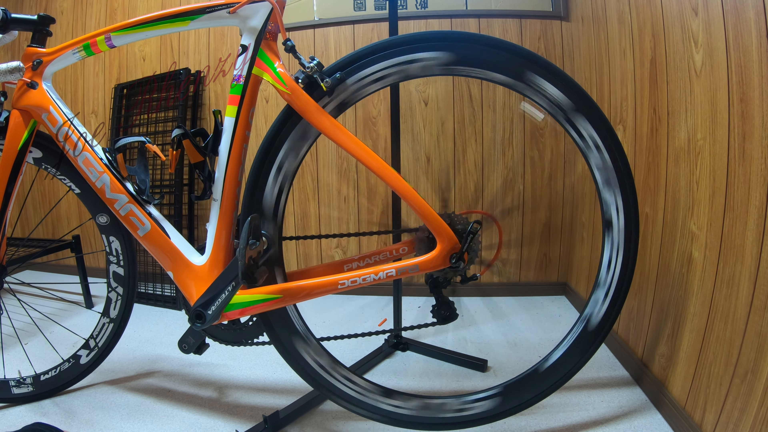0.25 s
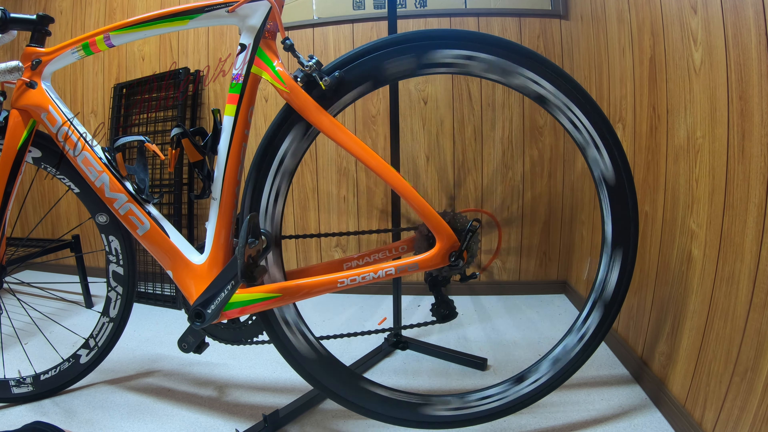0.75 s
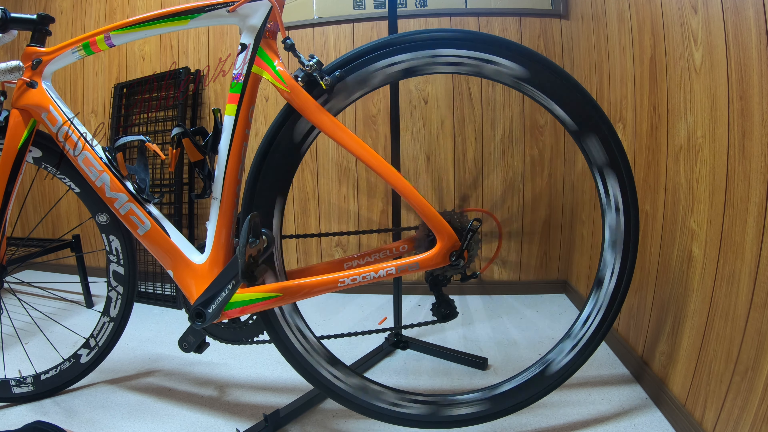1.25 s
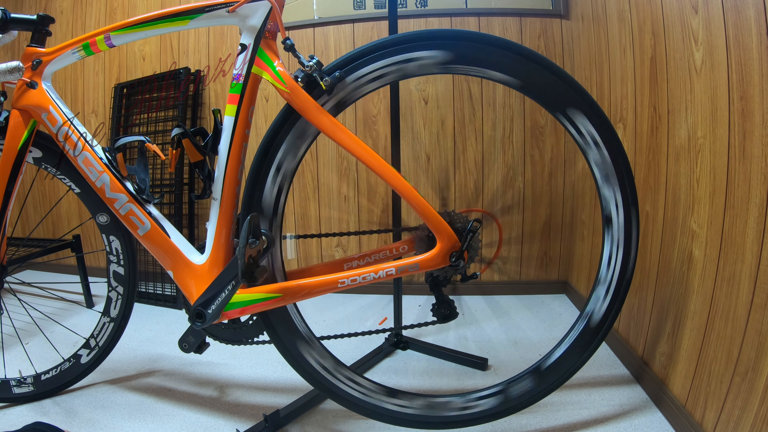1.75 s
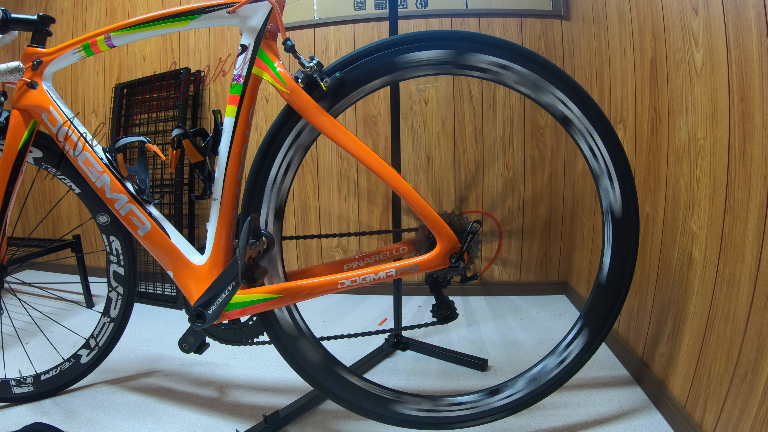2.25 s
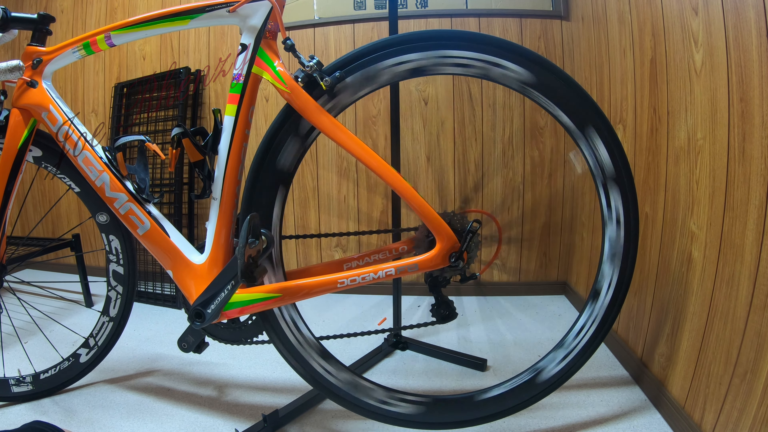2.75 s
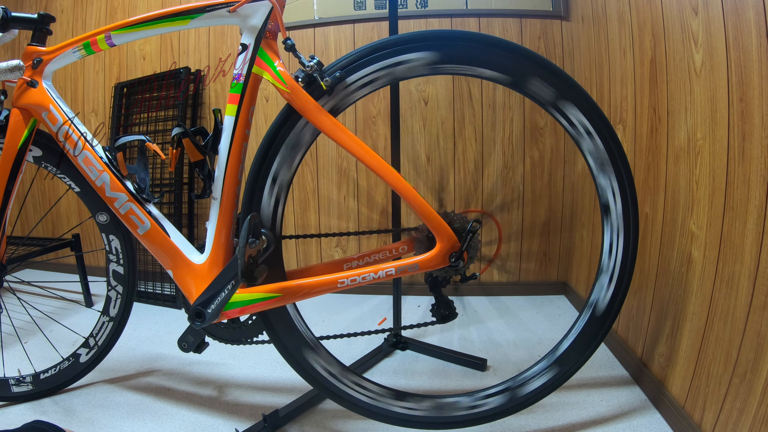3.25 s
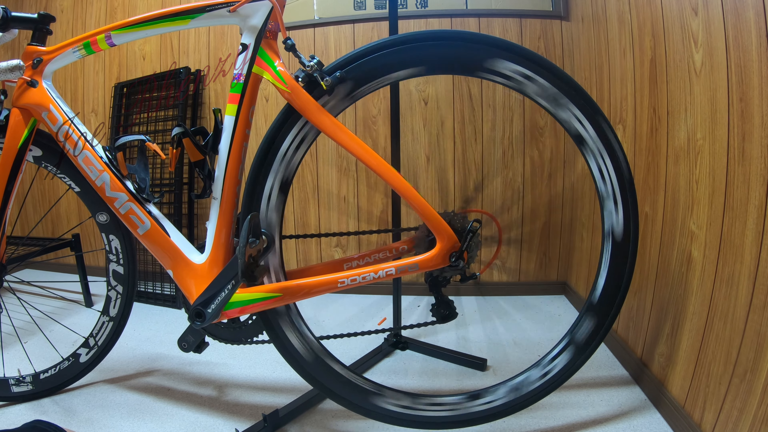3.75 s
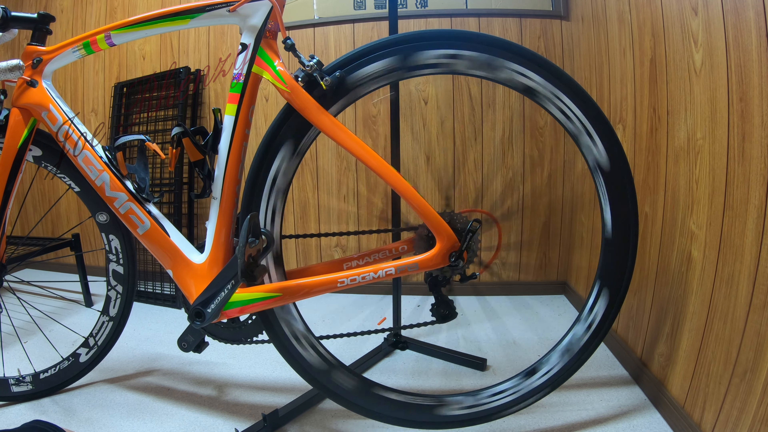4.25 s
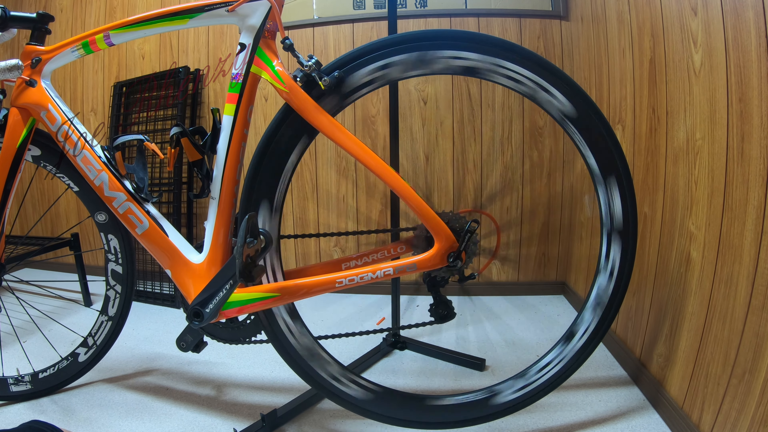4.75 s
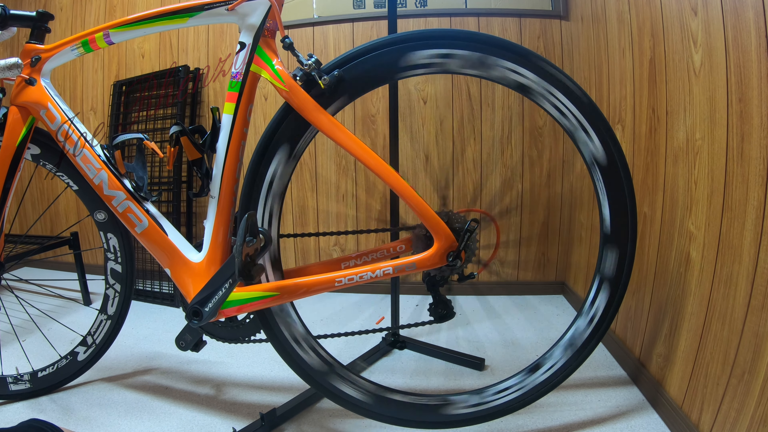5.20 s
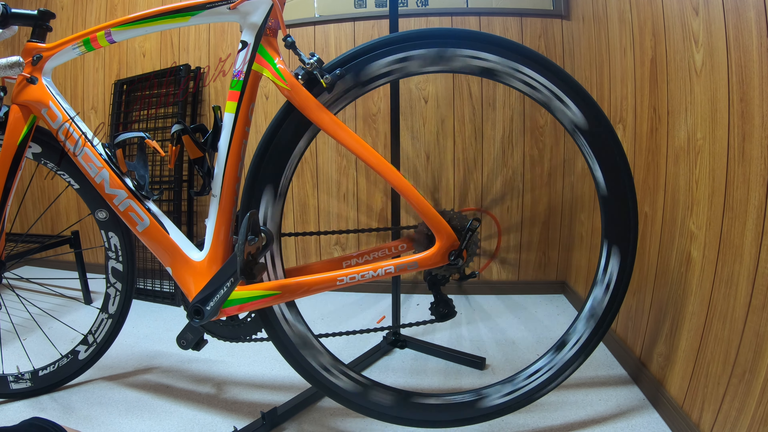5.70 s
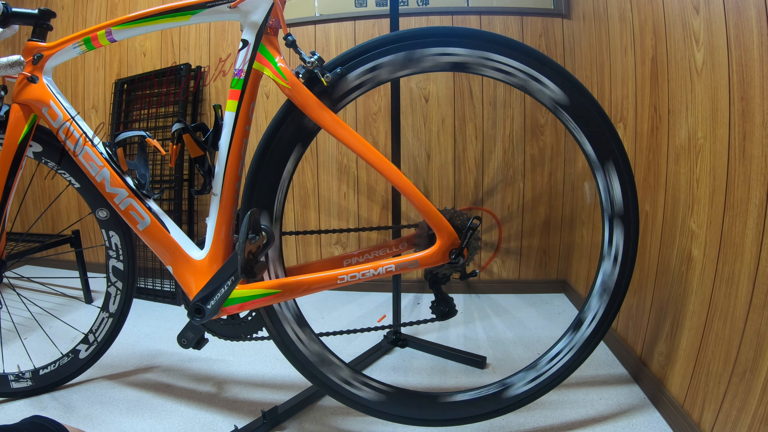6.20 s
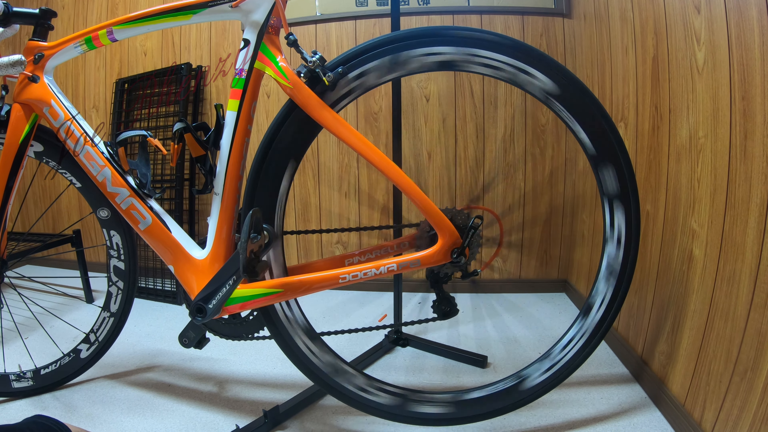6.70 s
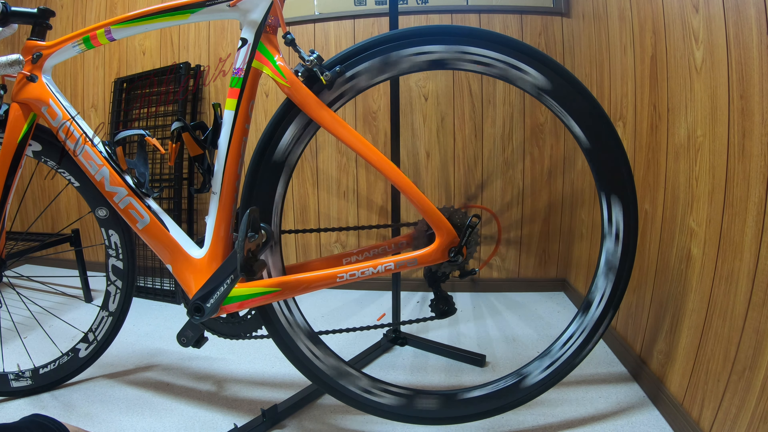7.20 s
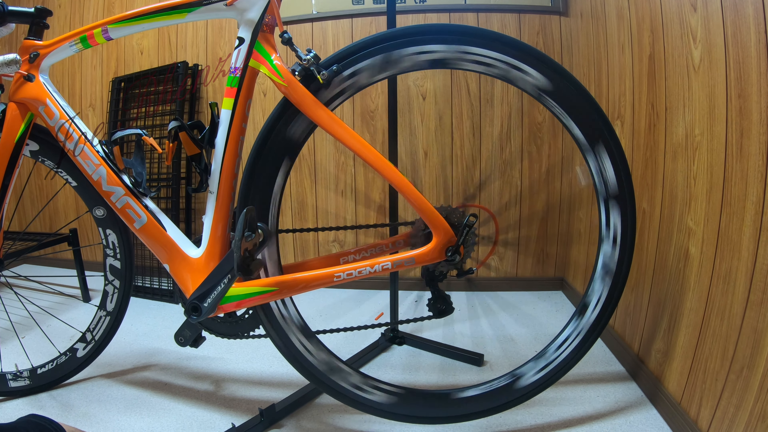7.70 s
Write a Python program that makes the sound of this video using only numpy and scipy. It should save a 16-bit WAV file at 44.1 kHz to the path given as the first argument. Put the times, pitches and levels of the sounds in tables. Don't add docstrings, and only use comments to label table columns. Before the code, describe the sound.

A bicycle's rear wheel coasts freely on a stand in a small wood-panelled room. Its ratchet makes a continuous, bright, metallic buzz of rapid clicks, about seventy-nine per second, sliding gently to about sixty-three. The rim rings and short wall echoes fill the gaps. A faint frame hum and low traffic rumble sit underneath. The stereo microphone is close.

```python
import sys
import numpy as np
from scipy import signal
from scipy.fft import rfft, irfft, next_fast_len
from scipy.io import wavfile
from scipy.ndimage import uniform_filter1d

SR = 44100
rng = np.random.default_rng(int(sys.argv[2]) if len(sys.argv) > 2 else 0)


def generate_wav(signal):
    frames = np.transpose(np.atleast_2d(signal))
    scaled = np.clip(frames, -1, 1) * 32767
    pcm = np.round(scaled).astype(np.int16)
    wavfile.write(sys.argv[1], SR, pcm)


def gain_from_db(level_db):
    decades = np.asarray(level_db, float) / 20
    return 10 ** decades


N = 351018
SIZE = next_fast_len(N + SR // 2, True)
HZ = np.fft.rfftfreq(SIZE, 1 / SR)
TEETH = 48
PORT_LAG_S = .003


def evened(x):
    return x / np.sqrt(np.mean(x ** 2) + 1e-20)


def read(points, hz):
    f, value = np.transpose(points)
    return np.interp(np.log(hz + 1), np.log(f + 1), value)


def shaped(x, gain):
    return irfft(rfft(x, SIZE) * gain, SIZE)[..., :N]


def mode(f, hz, width):
    return 1j * f * width / (hz ** 2 - f ** 2 + 1j * f * width)


def causal(db, size=8192):
    hz = abs(np.fft.fftfreq(size, 1 / SR))
    level = np.log(gain_from_db(np.maximum(db(hz), -100)))
    return np.fft.ifft(np.exp(np.conj(signal.hilbert(level)))).real[:size // 2]


def train(s, size):
    near = np.arange(-8, 9)
    at = np.round(s * SR).astype(int)[:, None] + near
    window = np.hanning(len(near) + 2)[1:-1]
    pulse = np.sinc(at - s[:, None] * SR) * window * size[:, None]
    inside = (at >= 0) & (at < N)
    return np.bincount(at[inside], pulse[inside], N)


def pair(z):
    # (f/Hz, likeness)
    same = [(60, 1), (120, 0.95), (240, 0.2), (480, 0.48), (950, 0.093), (1890, 0.2), (3770, 0.83),
            (7520, 0.024), (15000, 0.06)]
    # (f/Hz, level/dB)
    lean = [(60, -16), (120, -6), (240, 0.5), (480, -1), (950, -3), (1890, -1.5), (3770, -1.5),
            (7520, -3.5), (15000, 4)]
    alike = np.clip(read(same, HZ) * 0.92, 0, 1)
    ports = np.sqrt(alike) * z[0] + np.sqrt(1 - alike) * z[1:]
    lean_db = np.outer([.5, -.5], read(lean, HZ))
    return irfft(ports * gain_from_db(lean_db), SIZE)[:, :N]


def carried(x):
    return x[:, :N] + np.pad(x[:, N:], ((0, 0), (0, 2 * N - x.shape[1])))


def passing():
    # (start t/s, length/s, level/dB)
    passes = [
        (2.4, 2.7, -60),
        (6.7, 0.14, -68),
        (7.202, .35, -63),
        (7.774, 0.13, -57),
    ]
    approach_s, leave_s = 0.2, 0.044
    t = np.arange(N) / SR
    out = gain_from_db(-63)
    for s, length, db in passes:
        before = np.minimum((t - s) / np.minimum(approach_s, length), 0)
        after = np.maximum((t - s - length) / leave_s, 0)
        out = out + gain_from_db(db) * np.exp(before - after)
    return out


def rumble():
    # (f/Hz, level/dB per Hz)
    house_colour = [(60, -44), (110, -10.5), (170, 0.5), (260, -8.5), (420, -9), (700, -17), (900, -24),
                    (1200, -21.5)]
    # (f/Hz, level/dB per Hz)
    traffic_colour = [(12, -46), (20, -2), (65, 5), (103, 1), (107, -41), (120, -32.5), (160, 6),
                      (260, -120)]
    # (t/s, peak level/dB, f/Hz, t60/s)
    bumps = [
        (0.722, -22.5, 70.0, 0.044),
        (7.471, -36, 118, 0.12),
        (7.833, -35, 62.4, 0.096),
    ]
    noise = pair(rfft(rng.standard_normal((3, N)), SIZE))
    out = gain_from_db(-55.5) * evened(shaped(noise, gain_from_db(read(house_colour, HZ))))
    traffic = passing() * evened(shaped(noise, gain_from_db(read(traffic_colour, HZ))))
    traffic = np.array([traffic[0], np.roll(traffic[1], round(PORT_LAG_S * SR))])
    out = out + traffic * np.array([[1.6], [.5]])
    for s, db, hz, t60 in bumps:
        t = np.maximum(np.arange(N) / SR - s - np.array([[0], [PORT_LAG_S]]), 0)
        onset = (1 - np.exp(-t / 0.0045)) ** 2
        out = out + gain_from_db(db - 60 * t / t60) * np.sin(2 * np.pi * hz * t) * onset
    return out


def travel():
    # (t/s, teeth per s)
    speed = [(0, 78.81), (1, 76.69), (2, 74.61), (3, 72.57), (4, 70.56), (5, 68.56), (6, 66.58), (7, 64.6),
             (7.96, 62.69)]
    return np.cumsum(np.interp(np.arange(N) / SR, *np.transpose(speed))) / SR


def stand(teeth):
    # (f/Hz, width/Hz, level/dB)
    stand_modes = [(144.95, 5.2, -47.5), (141.3, 6.6, -51), (149, 9.1, -87), (162, 17, -70)]
    # (t/s, loss/dB)
    dips = [
        (2.63, 2),
        (3.3, 4),
        (3.92, 16),
        (4.38, 3),
        (4.72, 6),
        (5.3, 6),
    ]
    dip_s = .07
    t = np.arange(N) / SR
    hz = 2 * np.gradient(teeth) * SR
    answer = sum(gain_from_db(db) * mode(hz, f, width) * abs(mode(hz, f, width)) for f, width, db in stand_modes)
    loss_db = sum(db * np.exp(-((t - s) / dip_s) ** 2) for s, db in dips)
    return np.sqrt(2) * gain_from_db(-loss_db) * (answer * np.exp(2j * np.pi * 2 * teeth)).real


def frame(jolt, teeth):
    # (f/Hz, width/Hz, level/dB)
    frame_modes = [(169, 6.6, 14), (187.2, 6.3, 10.5), (237.6, 6.2, 1.5), (301, 13, -4.5), (336.4, 7.6, 2),
                   (368, 9.6, -4.5), (415, 7, -10), (481.5, 18, -5), (540.3, 4, -3)]
    gain = sum(gain_from_db(db) * mode(HZ, hz, 1.65 * width) ** 2 for hz, width, db in frame_modes)
    hum = gain_from_db(-59.5) * evened(shaped(jolt, gain))
    return (hum + stand(teeth)) * gain_from_db([[-.6], [.6]])


def knocks(teeth, late, odd_db=3.5, scatter=.00003, loose_db=-3.2):
    tooth = np.arange(int(teeth[-1]) + 2)
    odd = tooth % 2
    chance = rng.standard_normal((len(tooth), 2))
    mark = tooth - .2 + late * odd
    s = np.interp(mark, teeth, np.arange(N) / SR, left=-1, right=99) + scatter * chance[:, 0]
    return evened(train(s, gain_from_db(odd_db * odd + loose_db * chance[:, 1])))


def walls(x, first=.004, count=48):
    # (f/Hz, t60/s)
    decay = [(200, 0.9), (1000, 1), (4000, 0.53), (12000, 0.45)]
    taps = np.zeros((count, 2, SR // 2))
    start = np.arange(round(first * SR), SR // 2 - 20, 20)
    draws = (count, 2, len(start))
    at = start + rng.integers(0, 20, draws)
    np.put_along_axis(taps, at, rng.choice([-1., 1.], draws), 2)
    hz, t, z = signal.stft(taps, SR, nperseg=256)
    z = z + 0.37 * z[:, ::-1] / (1 + (hz[:, None] / 5900.0) ** 4)
    fall_db = -60 * t / read(decay, hz)[:, None]
    tails = signal.istft(z * gain_from_db(fall_db), SR, nperseg=256)[1]
    hop = N // (count - 1) + 1
    fade = np.sin(np.pi * (np.arange(2 * hop) + .5) / (2 * hop))
    padded = np.pad(x, ((0, 0), (hop, 2 * hop)))
    out = np.zeros((2, N + 3 * hop + SR))
    for k, tail in enumerate(tails / np.linalg.norm(tails[0, 0])):
        echo = signal.fftconvolve(padded[:, k * hop:(k + 2) * hop] * fade, tail, axes=1)
        out[:, k * hop:k * hop + echo.shape[1]] += echo
    return carried(out[:, hop:])


def rim(x):
    # (f/Hz, level/dB per Hz)
    broad = [(290, -88), (500, -38.5), (803, -30), (982, -23), (1600, -24.5), (1870, -13), (2130, -16),
             (2930, -0.5), (3580, -7), (3900, 0), (5200, -12.5), (9920, -9), (11400, -23), (14000, -23),
             (15500, -37)]
    # (f/Hz, width/Hz, level over broad colour/dB)
    rings = [(986.7, 20.3, 11), (1226, 31, 8.5), (1321, 13.6, 11.5), (1482, 113, 11.5), (1680, 26, 8),
             (1858, 34, 6), (1944, 27, 3.5), (2140, 50, 2.5), (2304, 120, 4), (3010, 380, 2),
             (3377, 210, 4.5), (3840, 160, 2.5), (4090, 75, -5), (4235, 220, 3.5), (5470, 95, 4),
             (5960, 204, 8), (6903, 160, 6.5), (7375, 145, 6), (8210, 260, 4.5), (8920, 66, 4),
             (10090, 660, 6)]

    def colour(f):
        return read(broad, f) + sum(db * abs(mode(f, hz, width)) ** 2 for hz, width, db in rings)

    return carried(signal.oaconvolve(x, causal(colour)[None]))


def ratchet(teeth, loose_db=0.17):
    # (landing after mark/teeth, level/dB, fixed error of each tooth/teeth, scatter/s)
    pawls = [
        (-.2, -4., .025, .0001),
        (-.13, 0., .03, .0001),
        (-.07, -1.5, .035, .00012),
        (.02, -6., .05, .0003),
    ]
    # (swings per turn, level/dB, phase/turns)
    wear = [(7, .4, .4), (13, .3, .5)]
    tooth = np.arange(int(teeth[-1]) + 2)
    lag, pawl_db, error, scatter = np.transpose(pawls)
    cut = error * rng.standard_normal((TEETH, len(pawls)))[tooth % TEETH]
    chance = rng.standard_normal((len(tooth), len(pawls), 2))
    landing = tooth[:, None] + lag + cut
    s = np.interp(landing, teeth, np.arange(N) / SR, left=-1, right=99) + scatter * chance[..., 0]
    wear_db = sum(db * np.cos(2 * np.pi * (k * tooth / TEETH - turns)) for k, db, turns in wear)
    return s, gain_from_db(pawl_db + wear_db[:, None] + loose_db * chance[..., 1])


def wheel(s, size, stagger=0.000155):
    # (f/Hz, width/Hz, swell/s, fall/s, spread from snap to snap/dB, tick over rattle/dB)
    parts = [(1310, 1220, 0.006, 0.0099, 3, -9.5), (3300, 620, 0.00042, 0.00086, 2, -3.5),
             (4160, 1460, 0.00022, 0.0026, 2.5, -3.5), (6400, 4460, 0.0012, 0.0026, 4, -11),
             (10250, 1760, 0.00056, 0.00066, 5.5, -9), (14000, 4600, .003, 0.00093, 1, -40)]
    # (sweeps per turn, level/dB, phase/sweeps)
    beams = [(2, -1.46, 0.53), (2, 0.55, 0.14), (2, 1, 0.9), (2, 0, 0.63), (1, 1.5, 0.01), (1, -0.4, .05)]
    t, z = np.arange(2000) / SR, 0
    turn = np.arange(len(s))[:, None] / TEETH
    share = [np.exp(-2 * ((HZ - part[0]) / part[1]) ** 2) + 1e-9 for part in parts]
    for part, band, (k, beam_db, phase) in zip(parts, share, beams):
        rise, fall, spread_db, tick_db = part[2:]
        chance = np.clip(rng.standard_normal((s.size, 2)), -2, 2)
        beamed = size * gain_from_db(beam_db * np.cos(2 * np.pi * (np.round(k) * turn - phase)))
        strength = beamed.ravel() * gain_from_db(spread_db * chance[:, 1])
        hits = train(s.ravel() + stagger * chance[:, 0], strength)
        envelope = (1 - np.exp(-t / rise)) * np.exp(-t / fall)
        swell = signal.oaconvolve(hits ** 2, envelope)[:N]
        rattle = evened(np.sqrt(abs(swell)) * rng.standard_normal((3, N)))
        tick = gain_from_db(tick_db) * evened(hits)
        z = z + rfft(rattle + tick, SIZE) * np.sqrt(band / sum(share))
    return evened(pair(z))


def scene():
    house = rumble()
    teeth = travel()
    axle = knocks(teeth, late=.44, odd_db=2.0, scatter=.0001, loose_db=4.0)
    hub = knocks(teeth, late=.17)
    dull_jolt = shaped(hub, 1 / (1 + 1j * HZ / 2280.0) ** 3) * gain_from_db([[2.5], [.7]])
    snaps = wheel(*ratchet(teeth))
    buzz = rim(snaps + gain_from_db(2.0) * walls(snaps) + dull_jolt)
    return gain_from_db(-21.5) * evened(buzz) + frame(axle, teeth) + house


def low_pass(x):
    return signal.sosfilt(signal.butter(12, 15630, fs=SR, output="sos"), x)


def record(dry):
    power = uniform_filter1d((dry ** 2).mean(0), round(.08 * SR))
    power_db = 10 * np.log10(power + 1e-12)
    even = dry * gain_from_db(-.5 * (power_db + 21.5))
    mix = .7 * np.tanh(even / .7)
    return low_pass(mix)


dry = scene()
out = record(dry)
generate_wav(out)
```